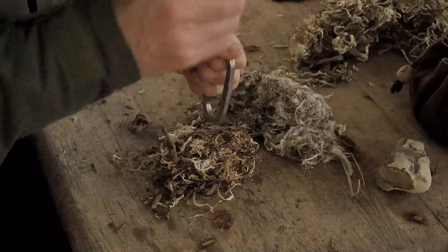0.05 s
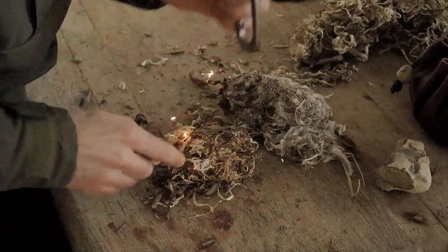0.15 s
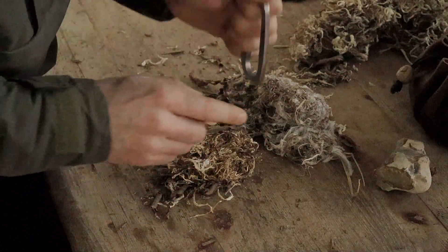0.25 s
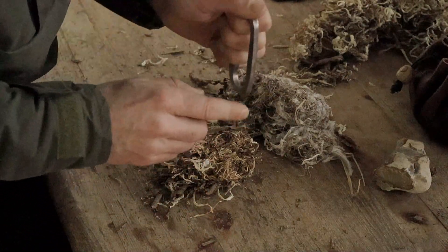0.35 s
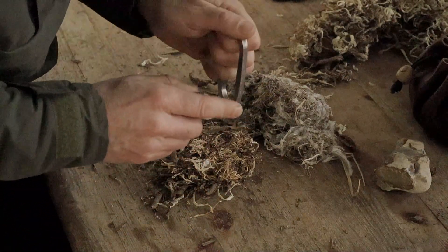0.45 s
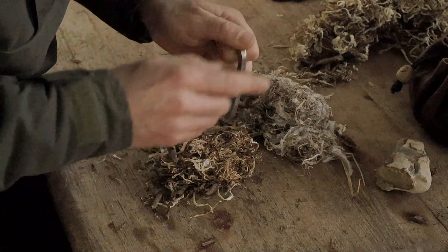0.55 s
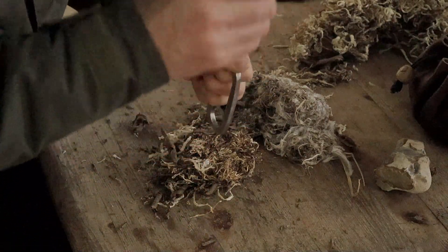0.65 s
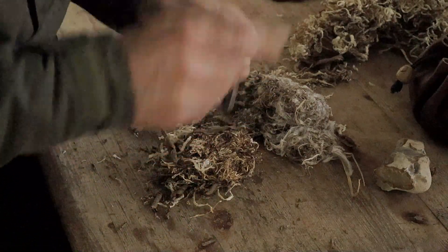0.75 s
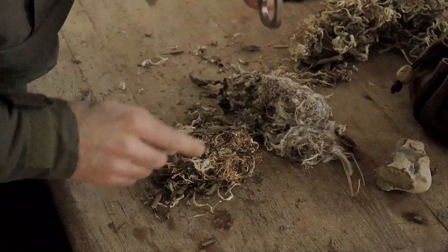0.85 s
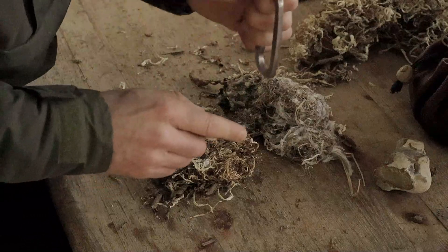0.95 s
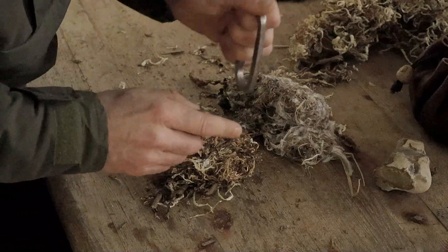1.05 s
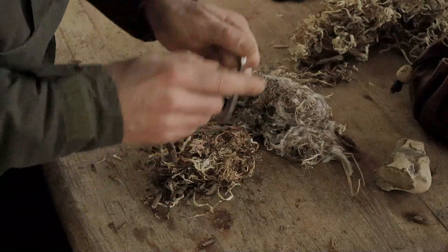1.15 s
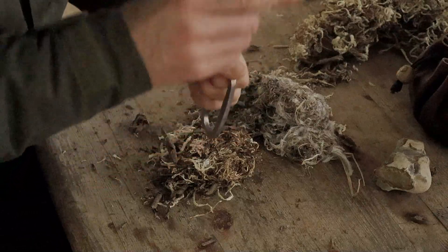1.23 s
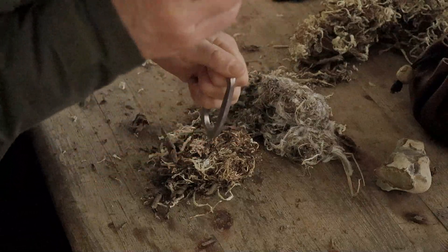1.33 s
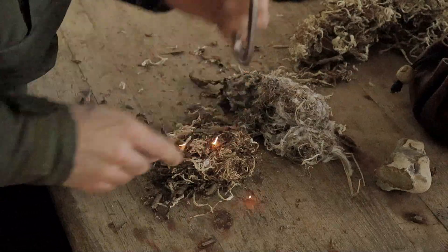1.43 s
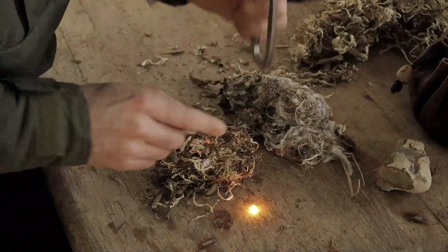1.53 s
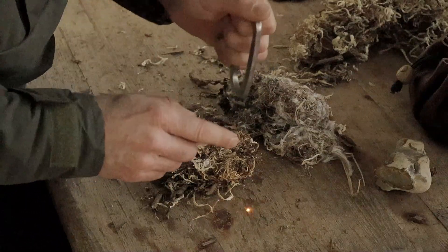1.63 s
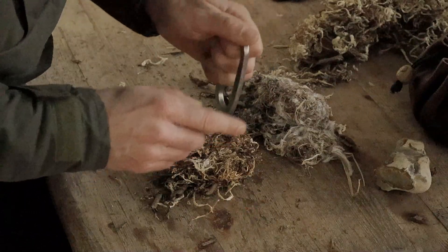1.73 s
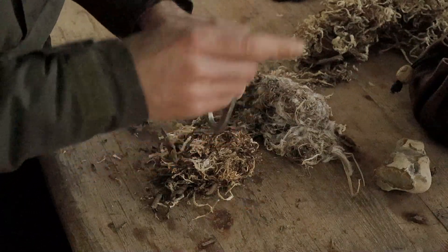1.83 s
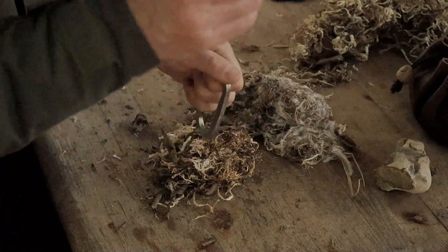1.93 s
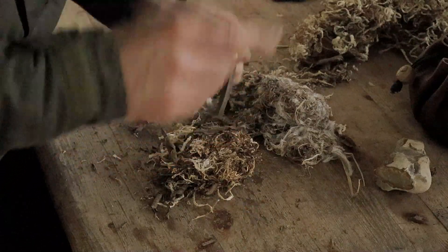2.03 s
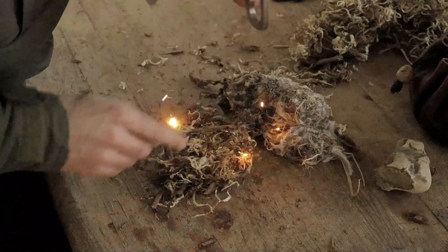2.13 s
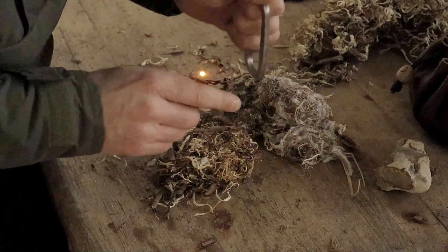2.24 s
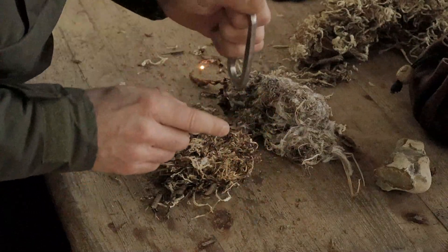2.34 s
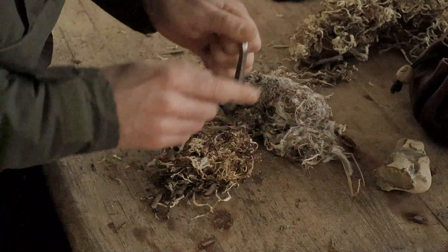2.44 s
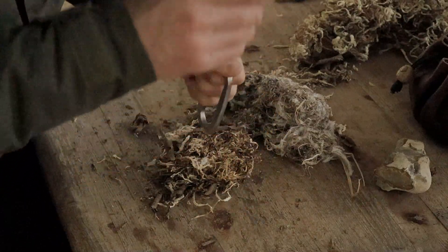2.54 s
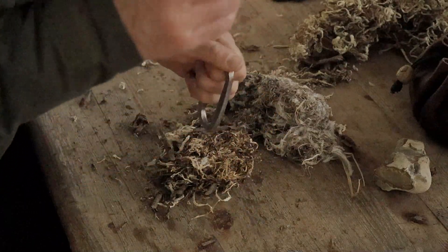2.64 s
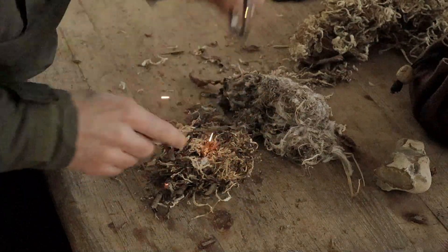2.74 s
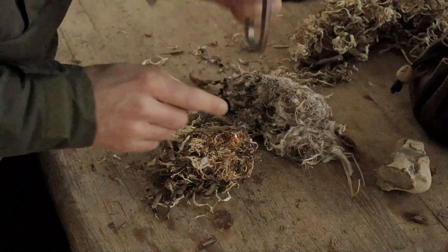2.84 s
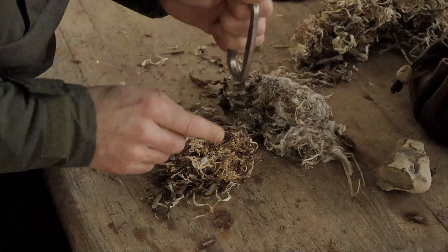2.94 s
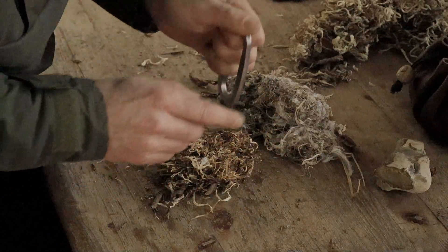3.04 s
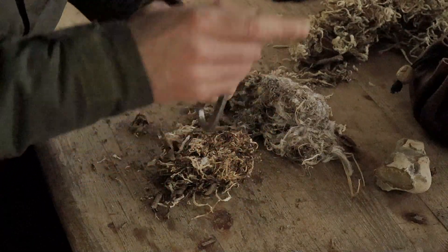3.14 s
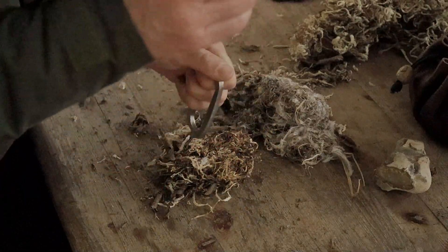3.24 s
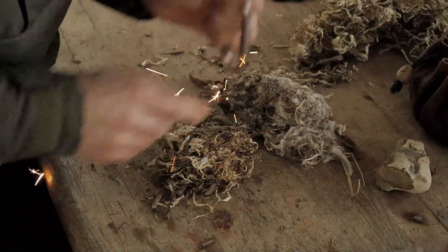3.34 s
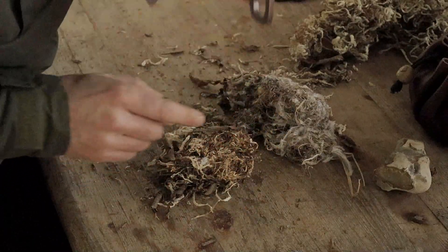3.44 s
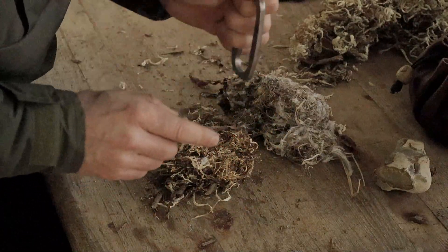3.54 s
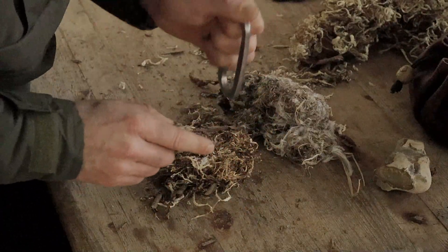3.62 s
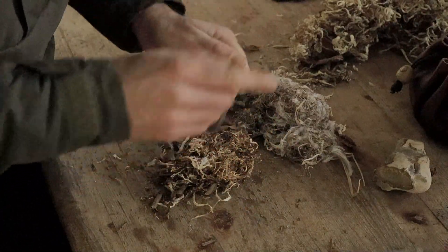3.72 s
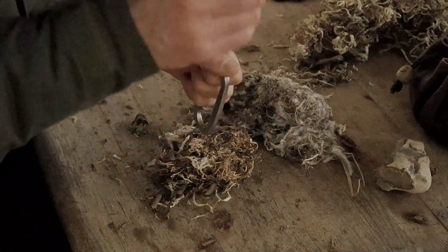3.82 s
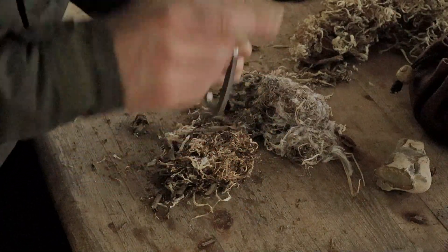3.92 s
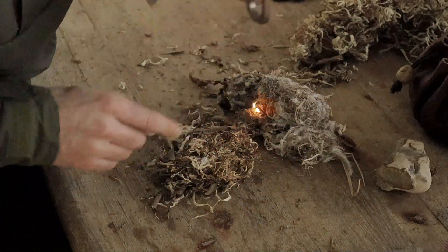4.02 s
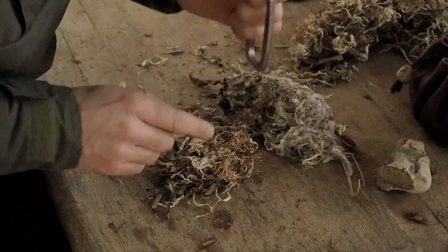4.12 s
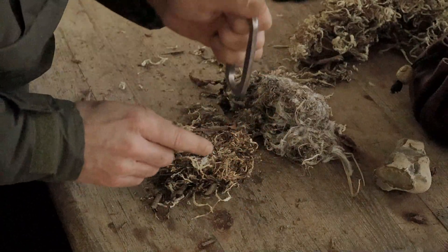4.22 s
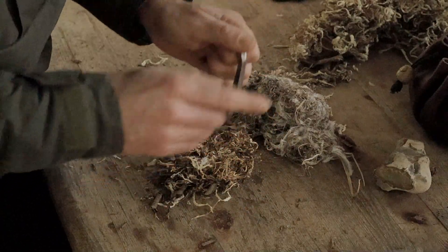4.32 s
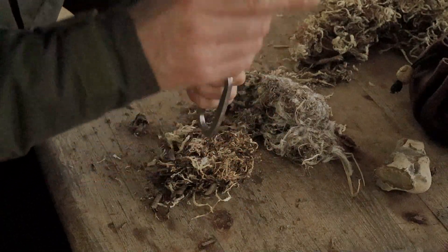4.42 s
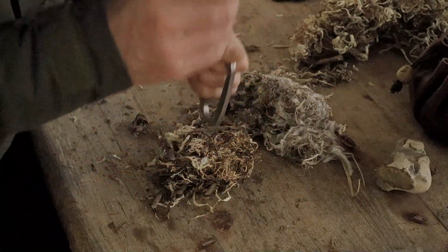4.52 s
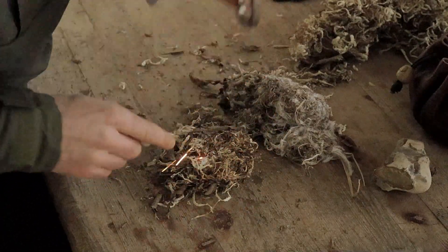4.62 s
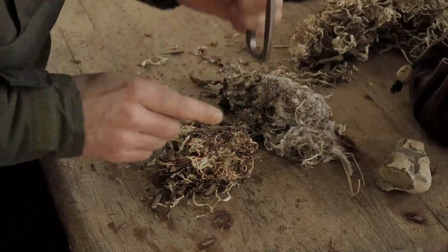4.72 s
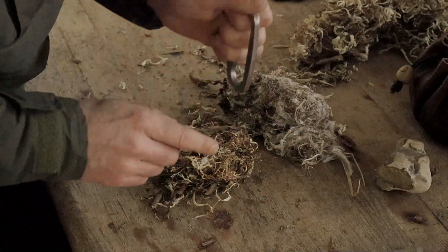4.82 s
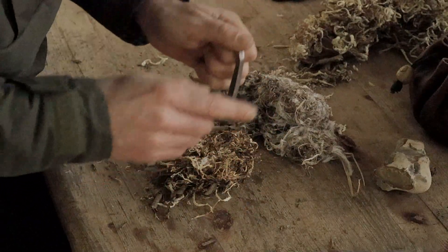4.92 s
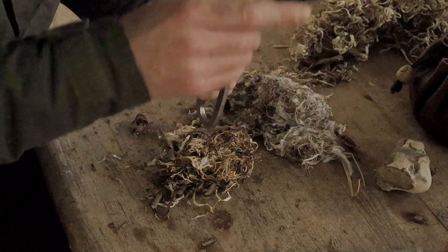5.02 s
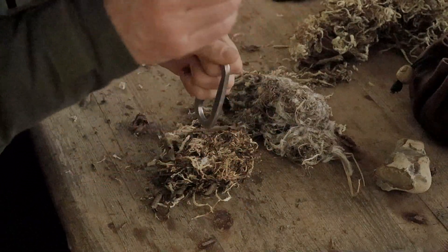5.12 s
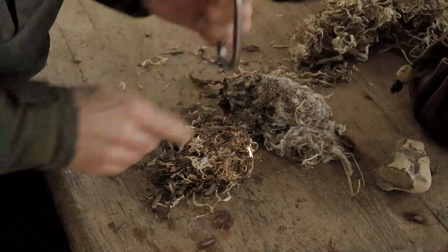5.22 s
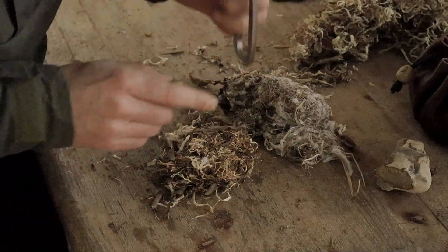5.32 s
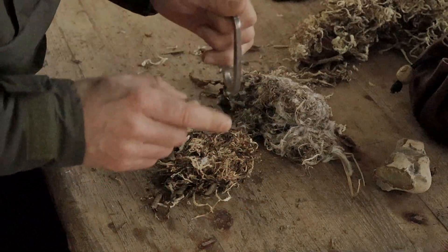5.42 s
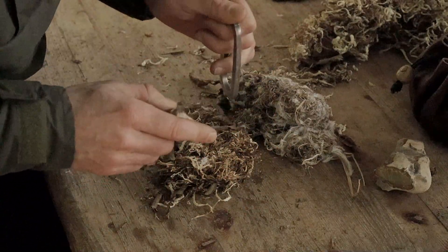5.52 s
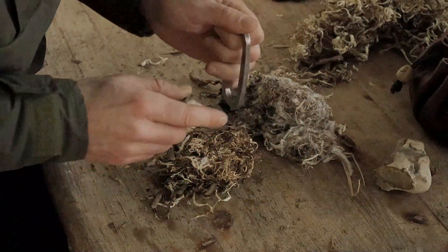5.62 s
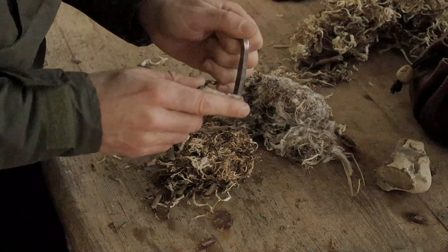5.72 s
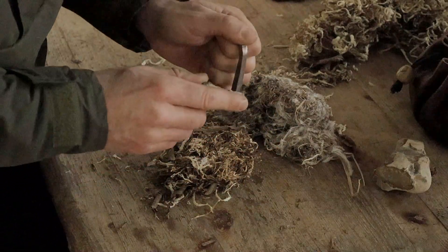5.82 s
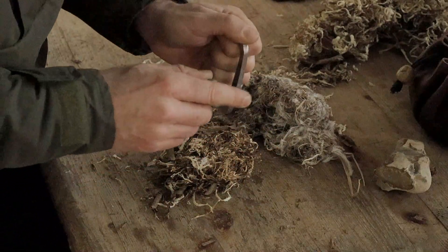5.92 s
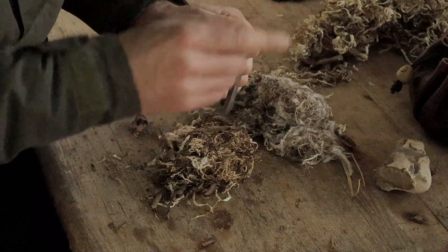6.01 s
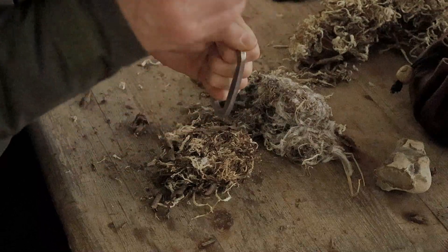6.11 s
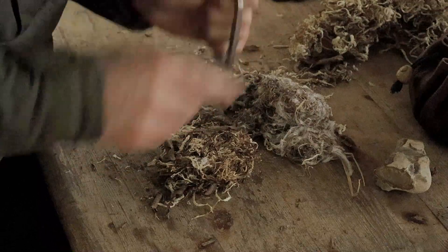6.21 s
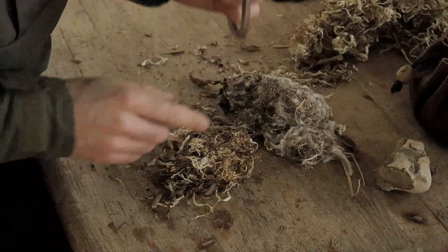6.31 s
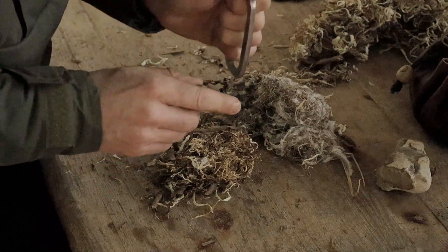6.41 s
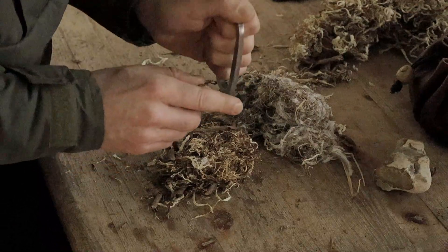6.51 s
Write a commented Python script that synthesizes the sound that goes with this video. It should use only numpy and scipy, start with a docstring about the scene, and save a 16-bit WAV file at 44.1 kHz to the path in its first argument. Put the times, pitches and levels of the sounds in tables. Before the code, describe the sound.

Flint and steel struck repeatedly over a wooden table: loud, abrupt, slightly overloaded clinks with crackling grit and a soft low thump beneath. A short airy hiss swells into each blow and vanishes after it; tiny sparks fizz faintly after a couple of early ones. Quiet touches of stone on metal come early and before the final strike. Close microphone, dry indoor space, low still-air noise.

```python
"""A steel striker hits a flint ten times over a wooden table in a small, dry room.
Each glancing blow is a scrape of a few milliseconds: a snap, gritty noise and damped partials of steel and
flint, loud enough to overload the close microphone. Where the edge lands decides which steel partials lead.
Filtered noise makes the fizzing sparks, the sleeve's rustle as the arm lifts, a broadband hiss that swells
into each blow and fades after it, and the still air; softer, duller clinks are flint and steel touching as
they are lined up. Two low hums swell by."""
import sys
import numpy as np
from scipy import signal
from scipy.fft import rfft, irfft
from scipy.io import wavfile
from scipy.ndimage import map_coordinates

SR = 44100
rng = np.random.default_rng(int(sys.argv[2]) if len(sys.argv) > 2 else 0)


def file_out(sig):
    """Save sig as 16-bit WAV at sys.argv[1]."""
    # one column per channel
    cols = np.atleast_2d(sig).T
    # limit, then scale
    lim = np.clip(cols, -1, 1)
    pcm = np.round(lim * 32767).astype(np.int16)
    wavfile.write(sys.argv[1], SR, pcm)


N = 289296
AGE = np.arange(SR // 2) / SR  # time since a contact [s]
CUTOFF_HZ = 15750  # top of the sound's band

# The steel swings as it strikes: largest pitch shift, up or down, of the room's diffuse sound [share].
DOPPLER = 0.011

# Blows: (time [s], force [dB], scrape length [s], point of contact along the steel [-1..1], thump trim [dB],
#         lingering partial [Hz], its level [dB], sleeve rustle on the lift before the blow [dB])
BLOWS = [ (0.1924, -0.24, 0.002, .5, -2.5, 5020, -46, -67.5),
         (0.8605, 0.5, 0.0012, -.4, -2, 4385, -46.5, -70), (1.4960, 0, 0.002, .8, -5, 4990, -48, -66),
         (2.1483, -0.46, 0.0025, -.3, -3.5, 4250, -45.5, -65),
         (2.791, -1.2, 0.0031, .2, -0.5, 4090, -50, -66), (3.417, 1.2, 0.0014, .8, -2, 5080, -42, -61.5),
         (4.0390, -1.2, 0.0023, -.8, -5, 4220, -41.5, -63),
         (4.6595, -0.5, 0.0026, -.3, 4.5, 4216, -41, -63.5),
         (5.2938, 0.8, 0.0035, .9, 2.5, 5120, -39.5, -64.5),
         (6.299, -1.5, 0.0012, -0.47, -6.5, 4170, -54.5, -59.5)]


def strikes(level_db=-3.0, thump_db=-25.0, thump_hz=70.76, thump_t60=0.038):
    """Every blow in the room, with its after-ring and a soft, damped low thump under it."""
    out = np.zeros(N)
    thump = np.sin(2 * np.pi * thump_hz * AGE) * dying(thump_t60)
    for s, force_db, length, point, thump_trim_db, linger_hz, linger_db, _ in BLOWS:
        blow = from_db(level_db + force_db) * strike(length, point)
        add(out, s, room(blow, DOPPLER))
        add(out, s, from_db(linger_db) * linger(length, linger_hz))
        add(out, s, from_db(thump_db + thump_trim_db) * thump)
    return out


# Colour of the scraping grit, relative: (frequency [Hz], level [dB per Hz])
GRIT_COLOUR = [(100, -13), (280, -17), (520, 4), (800, -10.5), (1500, 7), (2200, 1), (4000, -5.5),
               (6500, 3), (11000, 5), (13500, -3), (16000, -13.5)]


def strike(length, point, grit_db=-9.0, chips_db=-24.5, chips_t60=0.045,
           snap_db=6.5, snap_t60=0.00018, crackle_db=4.0):
    """A sharp one-sided snap, then the clink and grit, while chips and sparks crackle away."""
    # The crackle is a random level, redrawn every 50 samples.
    knots = AGE[::50]
    wobble = np.interp(AGE, knots, rng.standard_normal(len(knots)))
    chips = from_db(chips_db) * dying(chips_t60) * from_db(crackle_db * wobble)
    scrape = from_db(grit_db) * pressure(length)
    grit = noise(GRIT_COLOUR, len(AGE)) * (scrape + chips)
    snap = -from_db(snap_db) * dying(snap_t60)
    steel_db = [db + point * shift_db for _, _, db, shift_db, _ in STEEL_PARTIALS]
    return grit + snap + clink(length, steel_db, flint_db=0.0, ring_share=0.88)


# The steel's partials, damped by the grip:
# (frequency [Hz], t60 before the contact's ring share [s], level in a blow [dB],
#  gain per unit of the point of contact [dB], level in a light touch [dB])
STEEL_PARTIALS = [(2910, 0.031, -14.5, 3, 0.5), (4057, .019, -0.5, -2.5, -6), (5087, 0.032, -8.5, 4, -11),
                  (7544, 0.023, -12.5, 5.5, -15.5), (9832, 0.017, -6, -0.5, -10), (11732, .02, -11, 0, -27)]
# The hand-held flint's short rings: (frequency [Hz], level [dB])
FLINT_RINGS = [(1530, -18.5), (1780, -20), (2650, -19.5), (3200, -16), (3880, -10.5), (4300, -7),
               (4820, -10), (6400, -22), (7420, -21), (9430, -14.5), (10050, -14.5), (12050, -14.5)]
FLINT_T60 = 0.017  # [s], before the contact's ring share


def clink(length, steel_db, flint_db, ring_share, grip_detune=0.0029):
    """Steel and flint modes ring under one scrape; the grip shifts their pitch a little each time."""
    out = np.zeros(len(AGE))
    for (hz, t60, *_), db in zip(STEEL_PARTIALS, steel_db):
        pitch = hz * (1 + grip_detune * rng.normal())
        out += from_db(db) * ring(length, pitch, ring_share * t60)
    for hz, db in FLINT_RINGS:
        pitch = hz * (1 + 2 * grip_detune * rng.normal())
        out += from_db(db + flint_db) * ring(length, pitch, ring_share * FLINT_T60)
    return out


def ring(length, hz, t60, slip=1.3):
    """A mode swells while the edge scrapes, its phase jostled by tiny slips, then rings freely."""
    decay_per_sample = np.exp(-np.log(1000) / (t60 * SR))
    push = pressure(length)
    force = push * np.exp(-2 * AGE / length)  # the first bite is the hardest
    swell = signal.lfilter([1], [1, -decay_per_sample], force + 1e-18)
    slips = np.cumsum(rng.standard_normal(len(AGE)) * push)
    jostle = slip * slips / np.sqrt(push.sum())
    tone = np.sin(2 * np.pi * (hz * AGE + rng.random()) + jostle)
    return swell / swell.max() * tone


def pressure(length):
    """The edge bites at once, holds, and slides off, down to half at the scrape length."""
    return 1 / (1 + (AGE / length) ** 6)


def linger(length, hz, count=6, t60=0.55, spread=0.009):
    """The partial that the fingers damp least sings on as a cluster of close, beating tones."""
    tones = hz * (1 + spread * rng.standard_normal(count))
    return sum(ring(length, tone, t60) for tone in tones) / count


# Sparks that fizz out just after a blow: (time [s], level before the high-pass [dB], length [s])
SPARK_FIZZES = [(0.886, -43, 0.017), (2.184, -46.5, .021), (2.199, -34, .0012)]


def sparks(low_cut_hz=8000):
    """Burning specks of steel give a thin fizz: short bursts of high-passed white noise."""
    out = np.zeros(N)
    for s, db, length in SPARK_FIZZES:
        add(out, s, from_db(db) * rng.standard_normal(len(AGE)) * pressure(length))
    return signal.sosfilt(signal.butter(2, low_cut_hz, "high", fs=SR, output="sos"), out)


# Light touches: (time [s], level [dB], scrape length [s], dull above [Hz],
#                 point of contact along the steel [-1..1])
LIGHT_TOUCHES = [(0.4954, -24.5, 0.0013, 6860, 1), (0.548, -49, .004, 4000, .6),
                 (0.5543, -46, .004, 4000, .5), (0.5605, -43, 0.003, 4000, .7),
                 (5.8756, -20, 0.0039, 6000, -0.32), (5.907, -42.5, 0.005, 5000, 0),
                 (5.933, -51, 0.0012, 5000, 0.17), (6.0176, -39.5, 0.0058, 3950, -0.3)]


def touches(grit_db=-16.5, low_cut_hz=280.0, second_partial_fade_db=6.5):
    """Soft contacts stay pressed together: short, dull clicks led by the steel's lowest partial."""
    out = np.zeros(N)
    for s, db, length, dull_hz, point in LIGHT_TOUCHES:
        steel_db = [touch_db + point * shift_db for *_, shift_db, touch_db in STEEL_PARTIALS]
        steel_db[1] -= point * second_partial_fade_db  # an extra fade per unit of the point
        click = clink(length, steel_db, flint_db=-5.0, ring_share=0.5)
        click += from_db(grit_db) * noise(GRIT_COLOUR, len(AGE)) * pressure(length)
        edges_hz = [low_cut_hz, np.clip(dull_hz, 2 * low_cut_hz, CUTOFF_HZ)]
        band = signal.butter(2, edges_hz, "band", fs=SR, output="sos")
        dulled = signal.sosfilt(band, click)
        add(out, s, from_db(db) * room(dulled, doppler=0, early_db=-39.5))
    return out


# Shared colour of rustle and hiss, relative: (frequency [Hz], level [dB per Hz])
RUSTLE_COLOUR = [(100, -7), (300, -1.5), (1000, 0.5), (2000, 0.5), (4000, 0.5), (6000, -9.5), (10000, -8.5),
                 (15500, -19)]
FLOOR_DB = -72.5  # the rustle never rests entirely
LIFT_LEAD_S, LIFT_WIDTH_S = 0.22, 0.11  # the rustle peaks this long before a blow; its bell width
# Hiss: level at the blow [dB], length of the swell before it [s], fading after it [dB per s]
HISS_DB, HISS_RISE_S, HISS_FADE_DB_PER_S = -49.5, 0.085, 106


def rustle_and_hiss():
    """One noise: the sleeve rustles softly on each lift, and a hiss swells into the blow and fades."""
    t = np.arange(N) / SR
    power = from_db(FLOOR_DB) ** 2
    for s, *_, lift_db in BLOWS:
        since = t - s
        lift = from_db(lift_db) * np.exp(-0.5 * ((since + LIFT_LEAD_S) / LIFT_WIDTH_S) ** 2)
        swell = np.clip(1 + since / HISS_RISE_S, 0, 1)
        hiss = swell * from_db(HISS_DB - HISS_FADE_DB_PER_S * np.maximum(since, 0))
        power = power + lift ** 2 + hiss ** 2
    return np.sqrt(power) * noise(RUSTLE_COLOUR, N)


# Colour of the diffuse room sound, relative: (frequency [Hz], level [dB per Hz])
REVERB_COLOUR = [(100, -2.5), (600, -8.5), (1500, -3), (4000, 2.5), (8000, 6), (12000, -7), (16000, -10.5)]
# Reflections from table and walls: (delay [s], gain [ratio])
REFLECTIONS = [(.00185, .25), (.0034, .1), (.0062, .05), (0.0136, 0.054)]


def room(x, doppler, early_db=-40.0, early_t60=0.11, late_db=-63.0, late_t60=0.41, build_s=0.008, count=4):
    """Near reflections, a quick diffuse decay and a faint longer tail, Doppler-shifted by direction."""
    early = from_db(early_db) * dying(early_t60)
    late = from_db(late_db) * dying(late_t60)
    decay = (early + late) * (1 - np.exp(-(AGE / build_s) ** 2))
    out = x.copy()
    for shift in np.linspace(-doppler, doppler, count):
        shifted = map_coordinates(x, [np.arange(len(x)) * (1 + shift)], order=3)
        tail = noise(REVERB_COLOUR, len(AGE)) * decay
        out += signal.fftconvolve(shifted, tail)[:len(x)] / np.sqrt(count)
    for delay, gain in REFLECTIONS:
        lag = max(round(delay * SR), 1)
        out[lag:] += gain * x[:-lag]
    return out


# Faint, brief low hums: (time [s], level [dB], length [s], frequency [Hz])
LOW_HUMS = [(3.17, -55, 0.12, 160.8), (3.434, -51, 0.073, 171.5)]


def hums():
    """A low sine swells and fades once under a smooth bell."""
    out = np.zeros(N)
    for s, db, length, hz in LOW_HUMS:
        bell = np.sin(np.pi * np.minimum(AGE / length, 1)) ** 2
        add(out, s, from_db(db) * bell * np.sin(2 * np.pi * hz * AGE))
    return out


# Colour of the still air, relative: (frequency [Hz], level [dB per Hz])
AIR_COLOUR = [(15, -41), (25, -7), (55, 2), (86, -0.5), (165, -4), (261, -1), (485, -2), (526, -2.5),
              (570, -3.5), (1060, -4), (1280, -6.5), (3570, -19), (5800, -20.5), (9420, -33), (15700, -34)]


def still_air(level_db=-59.5):
    """Steady noise, strongest in the bass, lies under everything."""
    return from_db(level_db) * noise(AIR_COLOUR, N)


def from_db(db):
    """Decibels to gain."""
    return 10 ** (np.asarray(db) / 20)


def dying(t60):
    """An exponential envelope that falls 60 dB in t60 seconds."""
    return np.exp(-np.log(1000) * AGE / t60)


def noise(spectrum, size):
    """Gaussian noise of rms 1, coloured by a spectrum interpolated over log frequency."""
    hz, db = np.transpose(spectrum)
    bins_hz = np.fft.rfftfreq(size, 1 / SR)
    colour_db = np.interp(np.log(bins_hz + 1), np.log(hz), db)  # + 1 avoids log(0)
    x = irfft(rfft(rng.standard_normal(size)) * from_db(colour_db), size)
    return x / x.std()


def add(track, s, sound):
    """Mix a sound into the track at time s, cut off at the track's end."""
    at = round(s * SR)
    track[at:at + len(sound)] += sound[:N - at]


def scene():
    """Flint and steel in the room, over rustle, hiss, hums and still air."""
    return (strikes() + sparks() + touches() + rustle_and_hiss() + hums() + still_air())[None]


def record(dry, low_cut_hz=12.0):
    """The blows overload softly towards a ceiling of 0.95; then the deepest bass and the top are cut."""
    clipped = dry / (1 + (dry / 0.95) ** 8) ** (1 / 8)
    low_cut = signal.butter(2, low_cut_hz, "high", fs=SR, output="sos")
    top_cut = signal.ellip(10, 0.1, 70, CUTOFF_HZ, fs=SR, output="sos")
    return signal.sosfilt(top_cut, signal.sosfilt(low_cut, clipped))


dry = scene()
out = record(dry)
file_out(out)
```